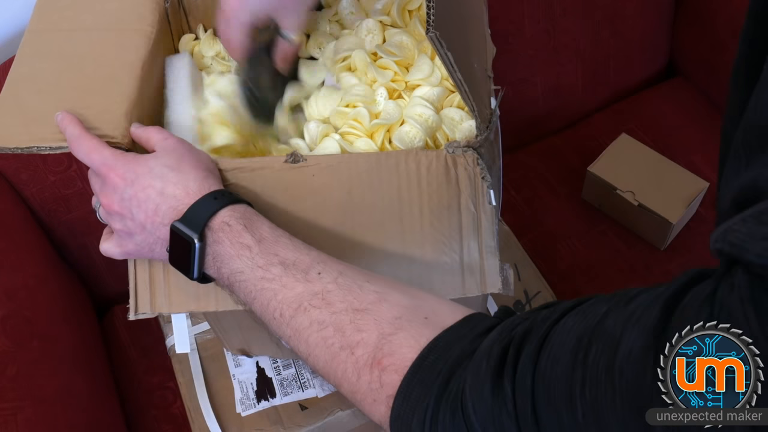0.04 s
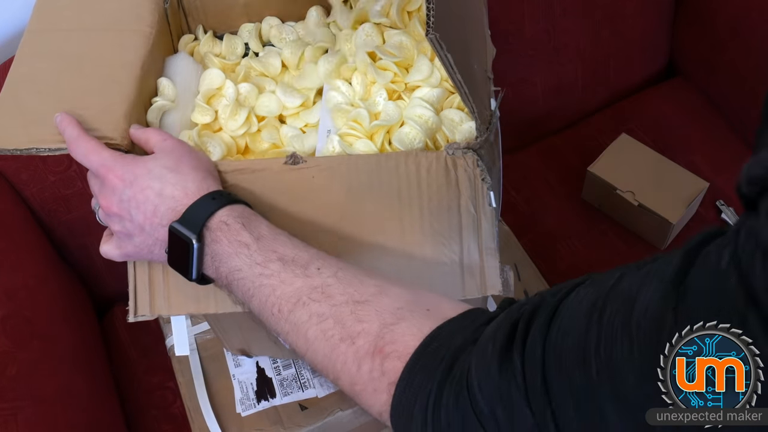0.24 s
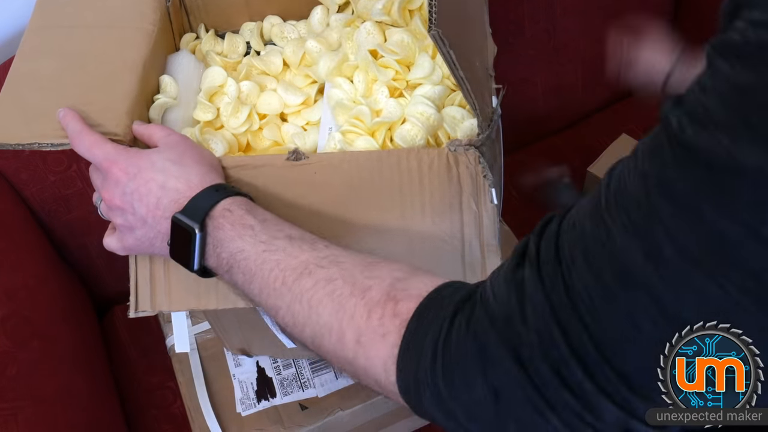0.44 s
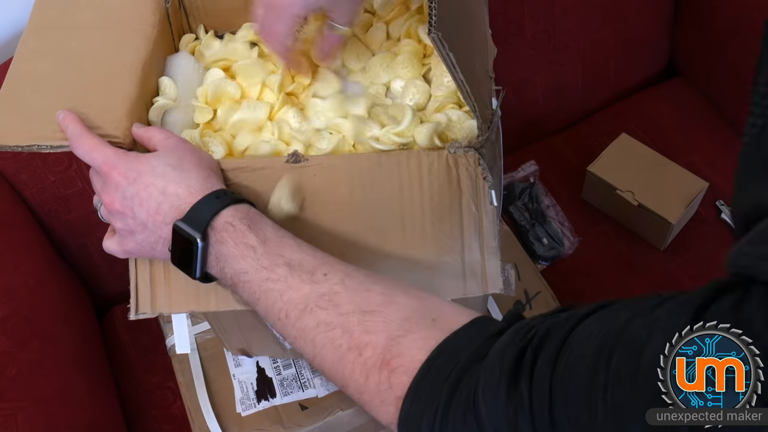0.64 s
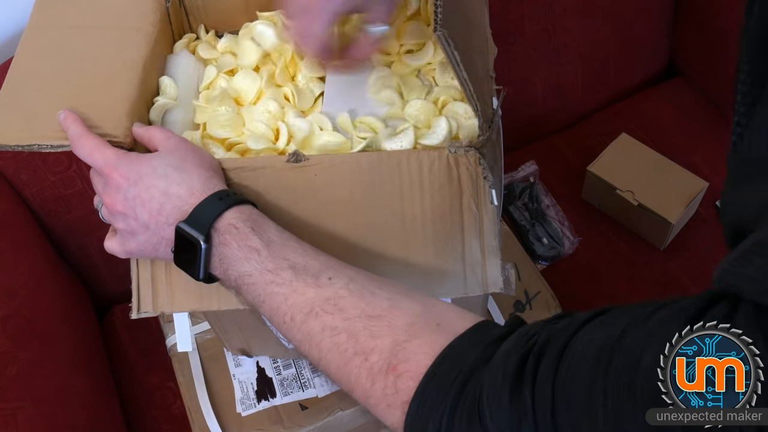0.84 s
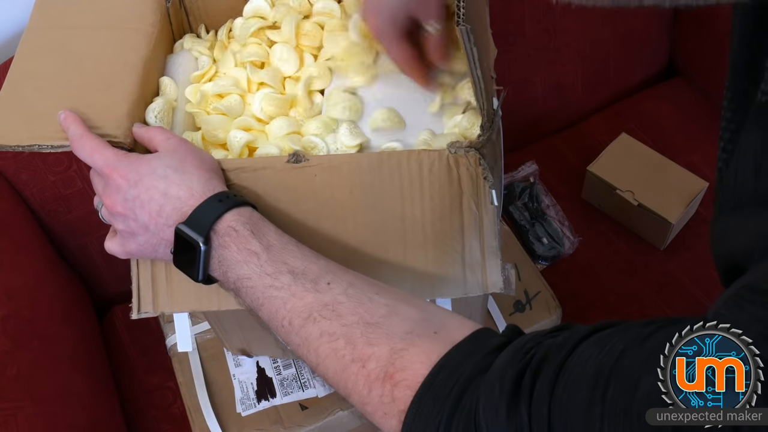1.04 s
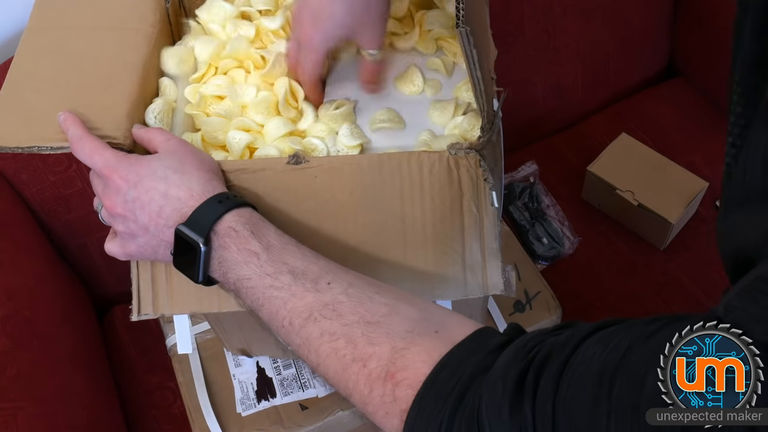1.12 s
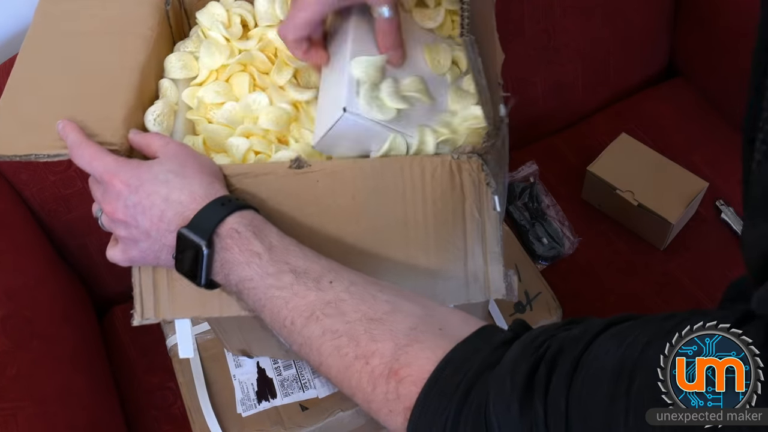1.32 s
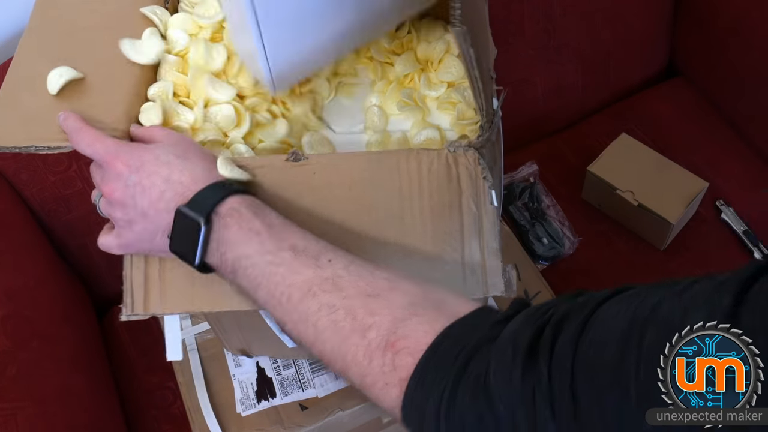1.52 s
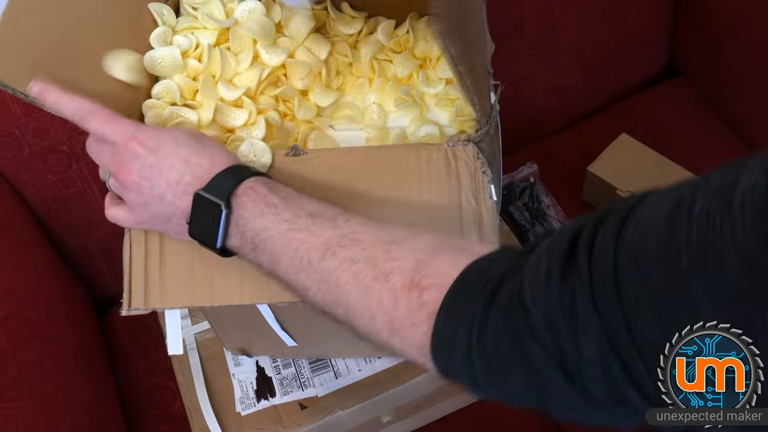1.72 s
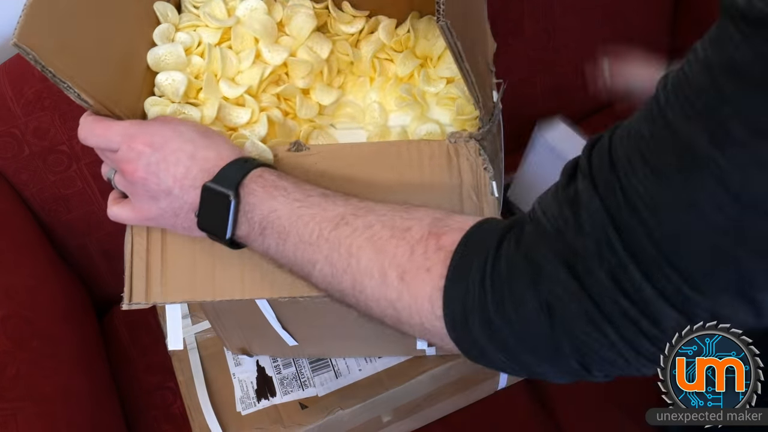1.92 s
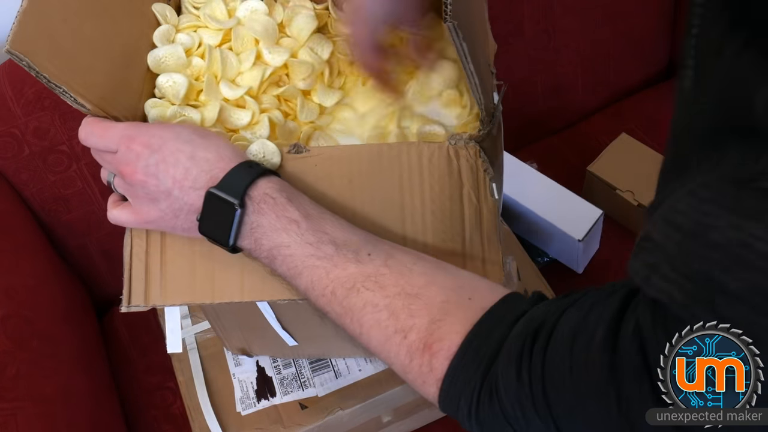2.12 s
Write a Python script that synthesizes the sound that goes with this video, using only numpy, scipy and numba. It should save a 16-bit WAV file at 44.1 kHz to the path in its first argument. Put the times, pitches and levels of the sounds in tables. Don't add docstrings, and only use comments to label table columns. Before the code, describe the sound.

Foam packing peanuts rustle dryly in a cardboard box as hands dig close to the microphone. The rustle settles by 0.3 s, with sparse ticks and knocks, then a brisk sweep at 0.7-0.9 s. A louder, brighter pull at 1.2-1.5 s carries a short rising squeak near 1.35 s. After a lull, pieces tumble with sharp clicks and thuds from 1.67 s, fading after 2 s into faint room hum.

```python
import sys
import numpy as np
from scipy import signal
from scipy.fft import rfft, irfft
from scipy.io import wavfile
from scipy.ndimage import uniform_filter1d
from numba import njit

SR = 44100
rng = np.random.default_rng(int(sys.argv[2]) if len(sys.argv) > 2 else 0)


def digitize_waveform(pressure):
    field = np.atleast_2d(pressure).T
    bounded = np.clip(field, -1, 1)
    quanta = np.round(bounded * 32767).astype(np.int16)
    wavfile.write(sys.argv[1], SR, quanta)


def ratio_of_db(decibels):
    return 10 ** (np.asarray(decibels, float) / 20)


N = 95697


def read(table, hz):
    table = np.array(table)
    return np.interp(np.log(hz), np.log(table[:, 0]), table[:, 1])


def level(x, db):
    return x * ratio_of_db(db) / np.sqrt(np.mean(x ** 2))


def colour(x, table):
    hz = np.arange(N // 2 + 1) * SR / N + 1
    return irfft(rfft(x) * ratio_of_db(read(table, hz)), N)


def walk(rate):
    hold = int(SR / rate)
    steps = np.repeat(rng.standard_normal(N // hold + 1), hold)
    return 1.37 * uniform_filter1d(uniform_filter1d(steps, hold), hold)[:N]


@njit
def ring(n, start, turn, fade, size, other, sr):
    out = np.zeros((2, n))
    for g in range(len(start)):
        pole = fade[g] * np.exp(1j * turn[g])
        z = 1. + 0j
        i = int(start[g] * sr)
        while i < n and z.real ** 2 + z.imag ** 2 > 1e-5:
            out[0, i] += size[g] * z.imag
            out[1, i] += size[g] * other[g] * z.real
            z *= pole
            i += 1
    return out


def rings(t, hz, t60, size, other):
    hz = np.clip(hz, 30, SR / 2.3)
    fade = np.exp(-np.log(1000) / (t60 * SR))
    return ring(N, t, 2 * np.pi * hz / SR, fade, size, other, 1. * SR)


def contacts(count, table, cycles, spread_db, db):
    c = rng.random((count, 5)).T
    t = c[0] * N / SR
    hz = table[0][0] * (table[-1][0] / table[0][0]) ** c[1]
    size = hz * ratio_of_db(read(table, hz) - spread_db * np.log(c[2] + 1e-4))
    t60 = cycles * (0.82 + 2.1 * c[3] ** 2) / hz
    unit = np.sqrt(np.sum(size ** 2 * t60) * SR / N / 4 / np.log(1000))
    return rings(t, hz, t60, size * ratio_of_db(db(t, hz)) / unit, np.sign(c[4] - .5))


def hits(rows, ratios, t60s, dbs, jitter):
    out = 0
    for ratio, t60, db in zip(ratios, t60s, dbs):
        c = rng.standard_normal((len(rows), 2)).T
        detune = np.exp(jitter * c[0] * (ratio != 1))
        hz = rows[:, 2] * ratio * detune
        out = out + rings(rows[:, 0], hz, np.full(len(rows), t60), ratio_of_db(rows[:, 1] + db), np.sign(c[1]))
    return out


def burst(rows, db, fade_s, band_hz, order=2):
    gate = np.zeros(N)
    np.add.at(gate, (rows[:, 0] * SR).astype(int), ratio_of_db(db))
    for _ in range(order):
        gate = signal.lfilter([1], [1, -np.exp(-1 / (fade_s * SR))], gate)
    band = signal.butter(2, band_hz, "band", fs=SR, output="sos")
    noise = signal.sosfilt(band, rng.standard_normal((2, N)))
    return gate / (fade_s * SR) ** (order - 1) * level(noise, 0)


# frequency in Hz, level in dB per Hz.
AIR = [(25, -9), (70, -2), (110, -6.5), (160, -12), (1000, -12), (3000, -19), (15000, -48)]


def air():
    return level(colour(rng.standard_normal((2, N)), AIR), -58.5) * ratio_of_db(0.5 * walk(5.5))


def room(dry):
    t60_s, rise_s, tail_db = 0.22, 0.0088, -13
    t = np.arange(int(.3 * SR)) / SR
    fade = np.exp(-np.log(1000) * t / t60_s) * np.clip(t / rise_s, 0, 1)
    tail = signal.lfilter([1], [1, -.3], rng.standard_normal((2, len(t))) * fade)
    tail *= ratio_of_db(tail_db) / np.sqrt(np.sum(tail ** 2, axis=1, keepdims=True))
    return signal.fftconvolve(dry, tail, axes=1)[:, :N]


# start in seconds, peak level in dB, ring in Hz.
KNOCKS = [(0.066, -28.5, 210), (0.108, -31, 760), (0.181, -37, 1190), (0.445, -33, 670),
          (0.535, -22.5, 558), (0.711, -33, 1210), (0.782, -28, 1374), (0.838, -29.5, 855),
          (1.932, -31.5, 607), (1.684, -37, 900), (0.885, -28.5, 480), (1.022, -42, 890),
          (1.149, -33.5, 298), (1.168, -22.5, 645), (1.463, -32, 1470), (1.532, -34.5, 960),
          (1.668, -31.5, 836), (1.695, -26, 560), (1.773, -29, 590), (1.802, -23, 996), (1.847, -25, 825),
          (1.903, -27, 640), (1.976, -28.5, 886)]


def knocks():
    rows = np.array(KNOCKS)
    rows[:, 0] += .002
    wall = hits(rows, [1, 1.4, .6], [.028, .02, .022], [-5, -8, -8], jitter=0.095)
    thud = burst(rows, rows[:, 1] - 3.5, 0.002, [220, 1500])
    rock = burst(rows, rows[:, 1] - 5, 0.014, [30, 105])
    return wall + thud + rock


# start in seconds, foam level in dB, # brightness in dB per octave, box scuff relative
# to the foam in dB.
SETTLE = [(0, -32.5, -2, -8), (.075, -41.5, -3.5, -6.5), (.115, -32.5, -2.5, -8.5), (.15, -35, -3, -8.5),
          (.19, -35, -2, -11.5), (.25, -46.5, -7, 1.5), (.34, -44.5, -7, -3.5), (.5, -40, -5.5, -9.5),
          (.68, -39.5, -3, -12.5)]
SWEEP = [(.71, -34.5, -3.5, -10.5), (.76, -33, 0.5, -20), (0.848, -29.5, 1, -10), (.875, -36.5, -3, -8),
         (.93, -42, -4, -8.5), (1.0, -52.5, -6, -1.5), (1.136, -53.5, -2, -18)]
PULL = [(1.145, -44, -0.95, -9), (1.154, -37.5, -0.7, -18), (1.25, -26.5, -2, -29), (1.28, -31, 3, -19),
        (1.38, -29.5, 2.5, -20), (1.46, -33, 1.5, -16.5), (1.49, -41.5, -4.5, -13), (1.56, -50.5, -3.3, -4),
        (1.666, -59.5, -3, -24)]
TUMBLE = [(1.671, -34.5, 1.04, -25), (1.69, -31, -0.44, -18), (1.72, -31.5, -0.33, -27),
          (1.76, -31, -0.024, -20), (1.805, -34, -0.21, -10), (1.82, -36, -1, -6.5),
          (1.85, -31, -1.5, -10.5), (1.865, -34.5, -2, -15), (1.888, -35.5, -2, -12)]
TUMBLE_LATE = [(1.897, -33.5, -3, -10), (1.925, -35, -1, -2.5), (1.945, -33, 0, -5), (1.958, -35, -1.5, -14),
               (1.98, -31.5, -1.4, -8), (2.001, -37, -1.4, -14), (2.028, -47, -5.5, -13),
               (2.09, -49.5, -4.7, -3.5), (2.17, -55.5, -7, -9)]


def stroke(t, column):
    rows = np.vstack([SETTLE, SWEEP, PULL, TUMBLE, TUMBLE_LATE])
    return np.interp(t, np.maximum.accumulate(rows[:, 0]), rows[:, column])


# frequency in Hz, level in dB per Hz.
BOX = [(120, -52), (250, -1), (500, 6), (900, 6.5), (1600, 6.5)]


def scuff():
    flurry = 0.96 * walk(35.3)

    def push(t, hz):
        return stroke(t, column=1) + stroke(t, column=3) - .8 + flurry[(t * SR).astype(int)]

    return contacts(count=6000, table=BOX, cycles=6.8, spread_db=0.7, db=push)


# start in seconds, length in seconds, level in dB, start pitch in Hz, end pitch in Hz.
SQUEAKS = [
    (0.75, .022, -48.5, 5695, 5610),
    (1.3, 0.041, -39, 3980, 4000),
    (1.332, 0.064, -31.5, 4000, 4140),
]


def squeaks():
    width_hz, slip_hz, grip = 140, 100, 1.6
    t = np.arange(N) / SR
    out = np.zeros((2, N))
    for start, length, db, hz0, hz1 in SQUEAKS:
        u = np.clip((t - start) / length, 0, 1)
        hz = hz0 + (hz1 - hz0) * u + width_hz * .5 * walk(400)
        phase = 2 * np.pi * np.cumsum(hz) / SR
        slip = 0.87 + 0.19 * np.sin(2 * np.pi * slip_hz * t + 2.6 * walk(29.7))
        slip = slip * (grip + walk(700))
        swell = u ** 0.76 * np.sqrt(1 - u ** 4)
        out += ratio_of_db(db + 7.0) * swell * slip * np.array([np.sin(phase), 0.3 * np.cos(phase)])
    return out


# frequency in Hz, gain in dB.
POCKETS = [(1700, -1.5), (2800, 1.5), (3600, -3), (4150, 3), (5000, -2.5), (5800, 3), (6800, 3.5),
           (8500, 0)]
# start in seconds, peak level in dB, ring in Hz, top crack relative to it in dB.
TICKS = [(0.3725, -27.5, 2440, -6.5), (0.4013, -34, 2488, -3), (0.4462, -26, 2680, -9),
         (0.458, -28, 3010, -10), (0.4928, -32.5, 3780, 5), (0.5072, -35, 2040, 6.5),
         (0.5386, -25.5, 1820, -6.5), (0.7016, -39, 4450, -14), (0.8424, -25, 6600, 2),
         (0.8456, -21.5, 7400, 1), (0.9397, -22.5, 3630, -3.5), (0.942, -28.5, 4500, -11),
         (1.0237, -39, 2100, -15), (1.037, -27.5, 3520, -12), (1.0451, -31, 2320, -21),
         (1.059, -41.5, 6670, 4), (1.081, -38, 6200, -6), (1.1391, -31.5, 2080, -13),
         (1.1579, -27, 2700, 3), (1.193, -24, 3180, -5.5), (1.6029, -42.5, 2136, 0),
         (1.6712, -26, 6680, -1), (1.7371, -18, 2800, -13), (1.758, -27, 2440, -2),
         (1.7706, -19.5, 2460, -2), (1.7772, -19, 2690, -9), (1.8046, -13, 2900, -9),
         (1.8349, -23, 2667, -8), (1.8509, -17, 2810, -11), (1.8933, -17, 2230, -3),
         (1.9369, -15, 2196, -18), (1.939, -18.5, 2730, -18), (1.9798, -26.5, 2850, -7),
         (1.9959, -24.5, 2850, -17.5), (2.0922, -41, 2340, 9)]


def ticks():
    rows = np.array(TICKS)
    rows[:, 0] += .0008
    body = hits(rows, [1, 0.718, 1.22, 1.9], [0.02, .010, 0.019, .012], [-5.5, -10.5, -10.5, -12.5],
                jitter=0.045)
    scrape = burst(rows, rows[:, 1] - 8, 0.002, [1600, 4000], order=1)
    crack = burst(rows, rows[:, 1] + rows[:, 3] - 2, 0.0015, [5400, 15000], order=1)
    return body + colour(scrape + crack, POCKETS)


# start in seconds, length in seconds, level in dB,
# centre in Hz, width in Hz.
RUBS = [(.72, .04, -39.5, 4600, 400), (0.771, 0.029, -38, 2680, 500), (0.791, .04, -35, 6800, 500),
        (0.883, .014, -32.5, 2620, 500), (1.149, 0.034, -41, 2670, 700), (1.194, 0.072, -39, 2870, 890),
        (1.2, 0.059, -40, 4050, 400), (1.34, .05, -37, 4270, 600), (.55, .12, -47, 2400, 900),
        (.7, .05, -41.5, 2380, 700), (1.235, 0.04, -32.5, 6670, 1200), (1.277, 0.039, -35.5, 2840, 700),
        (1.324, 0.0637, -33, 3150, 600), (1.396, 0.06, -36.5, 4290, 400), (1.409, 0.049, -32.5, 5850, 900),
        (1.672, .01, -34, 6900, 400), (1.685, 0.016, -32.5, 2330, 497), (1.693, 0.047, -35.5, 2960, 694),
        (1.746, .018, -28, 5600, 700), (1.751, 0.015, -36.5, 2540, 600), (1.773, .03, -35, 2700, 400),
        (1.777, .025, -32, 6040, 900), (1.867, 0.0134, -34, 2250, 500), (1.891, 0.034, -31.5, 6300, 800),
        (1.937, 0.016, -35.5, 2780, 800), (1.969, 0.037, -39, 2833, 700)]


def rubs():
    out = 0
    for start, length, db, hz, width_hz in RUBS:
        c = rng.random((200, 4)).T
        spread = width_hz * (c[1] + c[2] - 1)
        t60 = np.full(200, 14 / hz)
        unit = np.sqrt(len(t60) * t60 / length / 4 / np.log(1000))
        size = ratio_of_db(db) * np.sqrt(np.sin(np.pi * c[0] ** 0.74)) / unit
        out = out + rings(start + length * c[0], hz + spread, t60, size, np.sign(c[3] - .5))
    return out


# frequency in Hz, level in dB per Hz.
FOAM = [(1300, -13.5), (2500, -2.5), (4500, -2.5), (9000, -3.5), (15500, -7.5)]


def foam():
    flurry = 1.2 * walk(22) + .7 * walk(160)
    patch = np.array([walk(24.93) for _ in range(12)])

    def push(t, hz):
        i = (t * SR).astype(int)
        tilt = stroke(t, column=2) * np.log2(hz / 4500)
        band = (np.log2(hz) * 4).astype(int) % len(patch)
        return stroke(t, column=1) + tilt + flurry[i] + patch[band, i]

    rain = contacts(count=40000, table=FOAM, cycles=22.8, spread_db=0.5, db=push)
    return colour(rain, POCKETS)


# frequency in Hz, gain in dB.
MIC = [(30, -39.5), (250, -4.5), (500, 0), (14000, -2), (16000, -10.5)]
# frequency in Hz, side minus mid in dB.
APART = [(60, -7), (1500, -9.5), (2300, -17), (6900, -17), (8000, -4), (11000, -1), (14000, -1),
         (15500, -8)]


def scene():
    dry = colour(foam() + scuff() + ticks() + knocks() + squeaks() + rubs(), MIC)
    mid, side = dry + room(dry) + air() * ratio_of_db([[0], [-2]])
    side = colour(side + .33 * mid, APART)
    return np.array([mid + side, mid - side])


def top_cut(x):
    return signal.sosfilt(signal.butter(12, 15950, fs=SR, output="sos"), x)


def record(dry):
    low_pass = signal.ellip(10, .2, 80, 15850, fs=SR, output="sos")
    mix = signal.sosfilt(low_pass, dry)
    return top_cut(mix)


dry = scene()
out = record(dry)
digitize_waveform(out)
```